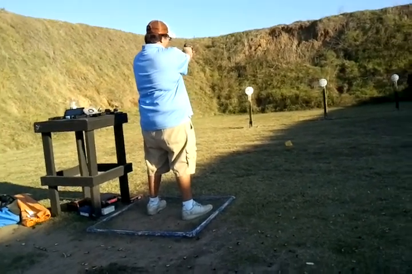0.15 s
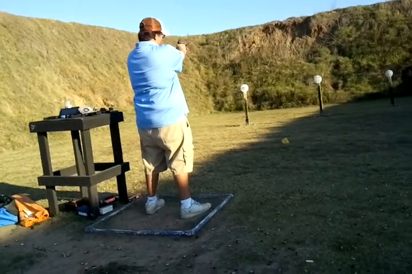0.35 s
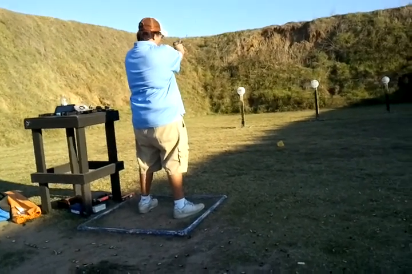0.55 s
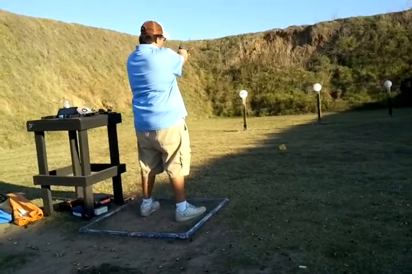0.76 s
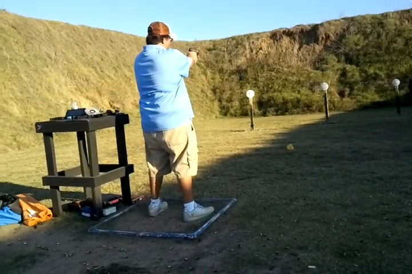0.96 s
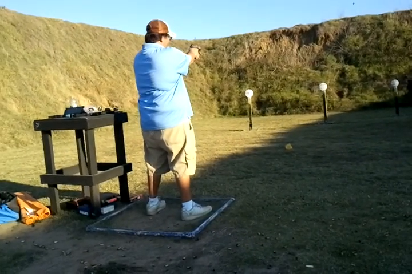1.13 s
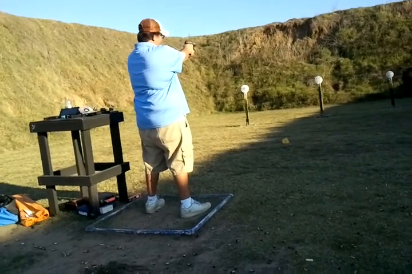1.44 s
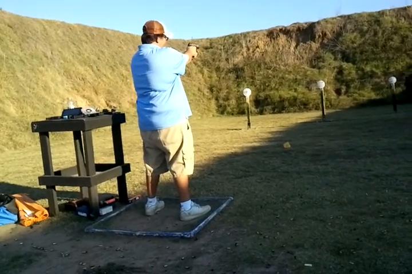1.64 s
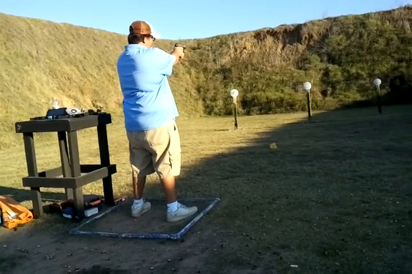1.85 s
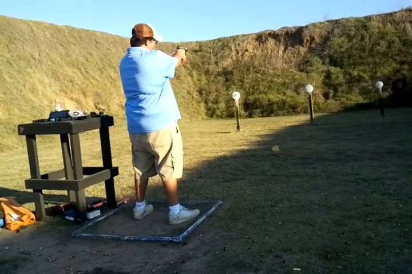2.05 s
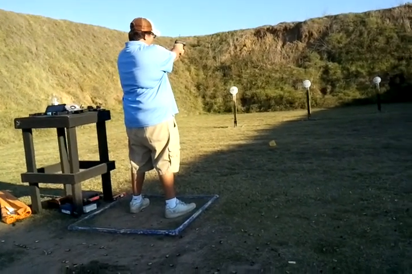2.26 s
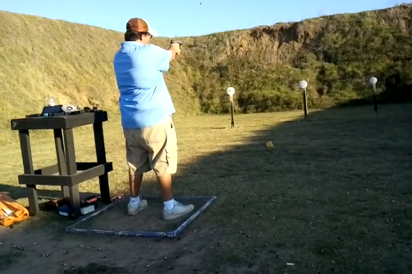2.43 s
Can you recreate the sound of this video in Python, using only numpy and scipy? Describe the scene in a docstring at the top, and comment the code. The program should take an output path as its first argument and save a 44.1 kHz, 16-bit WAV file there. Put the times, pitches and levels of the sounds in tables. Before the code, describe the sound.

Two sharp handgun shots outdoors, each followed by a bullet ringing a steel target.

```python
"""Two handgun shots on an outdoor range ringed by earth banks; each bullet rings a steel plate.
Blast and hit overload a small microphone, which sticks at its limit and recovers as the echoes return:
slaps from things nearby, scatter off the ground, then the banks and a long faint roll.
Two engines drone in the distance under a light hiss, with a few far clinks and a soft knock nearby."""
import sys
import numpy as np
from scipy import signal
from scipy.fft import rfft, irfft
from scipy.io import wavfile

SR = 44100
rng = np.random.default_rng(int(sys.argv[2]) if len(sys.argv) > 2 else 0)


def materialize(psi):
    """Save the field psi as 16-bit PCM at rate SR to the path in sys.argv[1].

    A 1-D psi becomes a single channel; in a 2-D psi each row is a channel.
    """
    bounded = np.clip(np.atleast_2d(psi).T, -1, 1)
    quanta = np.round(bounded * 32767).astype(np.int16)
    wavfile.write(sys.argv[1], SR, quanta)


N = 114219
T = np.arange(N) / SR

# Spectrum of the muzzle blast and of the bullet's crack on steel: frequency_hz, level_db
BLAST_SPECTRUM = [(80, -3), (400, 3.5), (1000, 5), (2500, -3.5), (4800, 6.5), (6000, 2), (7500, -8)]
BLAST_DECAY_S = .0006


def from_db(db):
    return 10 ** (np.asarray(db) / 20)


def rms_one(x):
    return x / np.sqrt(np.mean(x ** 2) + 1e-20)


def noise(spectrum):
    """Noise of rms 1, shaped by (frequency_hz, level_db) points and rolled off above the last."""
    hz, db = np.transpose(spectrum)
    bins_hz = np.maximum(np.fft.rfftfreq(N, 1 / SR), 1)
    gain = from_db(np.interp(np.log(bins_hz), np.log(hz), db))
    gain /= np.sqrt(1 + (bins_hz / hz[-1] / 1.2) ** 8)
    return rms_one(irfft(rfft(rng.standard_normal(N)) * gain, N))


def band(hz, ratio):
    """Noise of rms 1 from hz / ratio to hz * ratio."""
    sos = signal.butter(2, [hz / ratio, hz * ratio], "band", fs=SR, output="sos")
    return rms_one(signal.sosfilt(sos, rng.standard_normal(N)))


def drift(rate_hz):
    """Slow random wander of spread 1."""
    return noise([(rate_hz / 2, 0), (rate_hz, 0)])


def burst(start_s, decay_s, hold_s=0):
    """Instant attack, hold, exponential release."""
    return (T >= start_s) * np.exp(-np.maximum(T - start_s - hold_s, 0) / decay_s)


def dying(start_s, t60_s, hold_s=0):
    """A burst that falls by 60 dB in t60_s after its hold."""
    return burst(start_s, t60_s / np.log(1000), hold_s)


def tone(start_s, hz):
    return np.sin(2 * np.pi * hz * (T - start_s))


def handgun(shots):
    """Each blast is a short turbulent roar followed by a long suction that pins the microphone."""
    lead_s, suction_s = .002, .036
    out, roar = np.zeros(N), noise(BLAST_SPECTRUM)
    for start_s, length_s, level_db in shots:
        lead_crack = from_db(-33) * burst(start_s - lead_s, BLAST_DECAY_S, lead_s)
        blast = from_db(level_db) * burst(start_s, BLAST_DECAY_S, length_s)
        end_s = start_s + length_s
        suction = 5 * burst(end_s, decay_s=.016) * (1 - (T - end_s) / suction_s)
        out += roar * (lead_crack + blast) - suction
    return out


def range_echoes(shots):
    """Near slaps, scatter from the ground, broad returns from the banks and a long faint roll."""
    # Spectrum of the slaps and ground scatter: frequency_hz, level_db
    field_spectrum = [(100, -12.5), (300, -6.5), (480, -11), (700, 1.5), (1400, 2.5), (2400, -1),
                      (3600, -7.5), (5000, 0.5), (6200, -10), (7500, -20.5)]
    # Spectrum of the late roll: frequency_hz, level_db
    roll_spectrum = [(200, -10), (600, -6.5), (1200, -2.5), (2400, 2), (3600, 2), (4800, 5), (7000, -32)]
    # Reflections from things nearby: delay_s, level_db, decay_s
    slaps = [(.0365, -11, .0016), (.0392, -11, .001), (.054, -8.5, .0028), (.0622, -16, .0022),
             (.077, -15.5, .0014)]
    # Returns from the earth banks: delay_s, level_db, half_width_s, centre_hz
    banks = [(.148, -24.5, .008, 1100), (.147, -23.5, .01, 4200), (.21, -27, .007, 1200),
             (.28, -31, .022, 4700), (.295, -32.5, .02, 1300), (.342, -42, .011, 1050)]
    swell_s = .055
    out, field, roll = np.zeros(N), noise(field_spectrum), noise(roll_spectrum)
    bank_noises = [band(centre_hz, ratio=1.5) for *_, centre_hz in banks]
    for start_s, _, _ in shots:
        swell = np.clip((T - start_s) / swell_s, 0, 1) ** 2
        out += field * swell * from_db(-19) * dying(start_s, t60_s=.7, hold_s=swell_s)
        out += roll * swell * from_db(-36) * dying(start_s, t60_s=4.0)
        for delay_s, level_db, decay_s in slaps:
            out += field * from_db(level_db) * burst(start_s + delay_s, decay_s, hold_s=decay_s / 2)
        for (delay_s, level_db, half_width_s, _), bank_noise in zip(banks, bank_noises):
            hump = np.exp(-.5 * ((T - start_s - delay_s) / half_width_s) ** 2)
            out += bank_noise * from_db(level_db) * hump
    return out


def steel_plates():
    """A bullet cracks on steel, pushes the microphone to its other limit and rings the swaying plate."""
    # Bullet hits, one on each plate: start_s, crack_length_s, crack_db, shimmer_db
    hits = [(0.8168, .001, 5, -16.5), (2.5476, .002, -5.5, -14.5)]
    # Ringing modes, one list for each plate: pitch_hz, level_db, t60_s
    plate_modes = [
        [(1676, -30, 1.7), (1703, -33, 1.6), (1652, -32, .9), (2957, -33, .7), (4432, -21.5, .7),
         (4594, -36, .8), (5253, -20.5, .6), (6205, -16.5, .6)],
        [(1472, -19, .9), (1681, -27, 1.2), (2466, -24, .5), (4517, -38, .6), (4931, -24, .5), (5288, -9.5, .5)],
    ]
    # Spectrum of the dense upper modes: frequency_hz, level_db
    shimmer_spectrum = [(300, -20.5), (1500, -13), (3000, -12), (4000, -15), (4600, 1.5), (5300, 0),
                        (5900, -15.5), (7000, -36)]
    out, crack, shimmer = np.zeros(N), noise(BLAST_SPECTRUM), noise(shimmer_spectrum)
    for (start_s, length_s, crack_db, shimmer_db), modes in zip(hits, plate_modes):
        out += crack * from_db(crack_db) * burst(start_s, BLAST_DECAY_S, length_s)
        out += 1.25 * burst(start_s + length_s, decay_s=.038)  # the push on the microphone
        out += shimmer * from_db(shimmer_db) * dying(start_s, t60_s=.55)
        for pitch_hz, level_db, t60_s in modes:
            waver_db = 6 * drift(rate_hz=25)
            out += from_db(level_db + waver_db) * tone(start_s, pitch_hz) * dying(start_s, t60_s)
    return out


def plate_ping(start_s=.8405, rise_s=.009):
    """A bright ping swells out of the first plate's ring."""
    age = np.maximum(T - start_s, 0) / rise_s
    return from_db(-9.5) * age * np.exp(1 - age) * tone(start_s, hz=6212)


def near_knock():
    """A soft knock near the microphone: a few milliseconds of dull noise."""
    return from_db(-30.5) * band(hz=380, ratio=2.1) * burst(start_s=2.118, decay_s=.003)


def far_clinks():
    """Metal clinks some way off, each a tick and one ringing mode."""
    # Clinks: start_s, tick_hz, tick_db, ring_hz, ring_db, ring_t60_s, treble_db
    clinks = [(.233, 1900, -33.5, 1240, -47, .2, -40.5), (.381, 1600, -32.5, 1240, -28, .24, -40),
              (1.636, 1350, -33, 1632, -36.5, .6, -31)]
    out = np.zeros(N)
    for start_s, tick_hz, tick_db, ring_hz, ring_db, ring_t60_s, treble_db in clinks:
        tick = from_db(tick_db) * band(tick_hz, ratio=1.35)
        treble = from_db(treble_db) * band(hz=5400, ratio=1.15)
        out += (tick + treble) * burst(start_s, decay_s=.012)
        out += from_db(ring_db) * tone(start_s, ring_hz) * dying(start_s, ring_t60_s)
    return out


def engine(speed, harmonics, waver_db):
    """An engine drones on low harmonics of its firing rate, each wavering in level."""
    firing_hz = np.interp(T, *np.transpose(speed))
    phase = 2 * np.pi * np.cumsum(firing_hz) / SR
    out = np.zeros(N)
    for multiple, level_db in harmonics:
        gain = from_db(level_db + waver_db * drift(rate_hz=5))
        out += gain * np.sin(multiple * phase + 2 * np.pi * rng.random())
    return out


def distant_engines():
    """Two engines in the distance, one idling and one revving."""
    # Engine speeds: time_s, firing_hz
    idle_speed = [(0.05, 46.6), (0.47, 46.4), (1.17, 47.8), (1.79, 46.4), (2.38, 46.6)]
    revving_speed = [(0, 70), (.4, 77), (.68, 69), (1.0, 88), (1.3, 83), (1.5, 96), (1.9, 88), (2.2, 77),
                     (2.55, 84)]
    # Harmonics of the firing rate: multiple, level_db
    idle_harmonics = [(1, -31), (2, -46.5), (3, -46), (4, -47), (5, -55.5)]
    revving_harmonics = [(1, -38.5), (2, -49.5), (3, -60)]
    idling = engine(idle_speed, idle_harmonics, waver_db=1.9)
    return idling + engine(revving_speed, revving_harmonics, waver_db=1.0)


def ambience():
    """The bed of the open range: low rumble and a light hiss that gently rises and falls."""
    # Spectra of rumble and hiss: frequency_hz, level_db
    rumble_spectrum = [(20, -1), (50, 4.5), (100, 1), (180, -6.5), (260, -12), (400, -22.5), (800, -28)]
    hiss_spectrum = [(200, 1.5), (450, -4.5), (750, -2), (1150, 6.5), (1600, 0), (2400, 1), (3500, -2.5),
                     (4500, 5.5), (5500, 0.5), (6400, -9), (7300, -25.5)]
    # Loudness of the hiss: time_s, level_db
    hiss_levels = [(0, -41), (.12, -42.5), (.33, -40.5), (.6, -43.5), (1.5, -41.5), (1.85, -41),
                   (2.0, -44.5), (2.45, -44)]
    hiss_db = np.interp(T, *np.transpose(hiss_levels))
    return from_db(-40) * noise(rumble_spectrum) + from_db(hiss_db) * noise(hiss_spectrum)


def scene():
    """The range in mono, as it reaches the microphone."""
    # Muzzle blasts: start_s, length_s, level_db
    shots = [(0.7433, .0075, 14), (2.4553, .011, 23)]
    shooting = handgun(shots) + range_echoes(shots) + steel_plates() + plate_ping()
    return (shooting + near_knock() + far_clinks() + distant_engines() + ambience())[None]


def record(dry):
    """An off-centre preamp saturates, the band is narrowed, and the overshooting peaks are rounded."""
    bias, rail, knee, headroom = -.2, .56, .6, .17  # in units of full scale
    bandwidth_hz, cutoff_hz = 7100, 16000
    band_limit = signal.butter(16, bandwidth_hz, fs=SR, output="sos")
    top_cut = signal.ellip(10, .1, 80, cutoff_hz, fs=SR, output="sos")
    biased = dry + bias
    saturated = biased / (1 + (biased / rail) ** 8) ** (1 / 8)
    narrowed = signal.sosfilt(band_limit, saturated - bias) + bias
    within_knee = np.clip(narrowed, -knee, knee)
    rounded = within_knee + headroom * np.tanh((narrowed - within_knee) / headroom)
    return signal.sosfilt(top_cut, rounded - bias) + bias


dry = scene()
out = record(dry)
materialize(out)
```